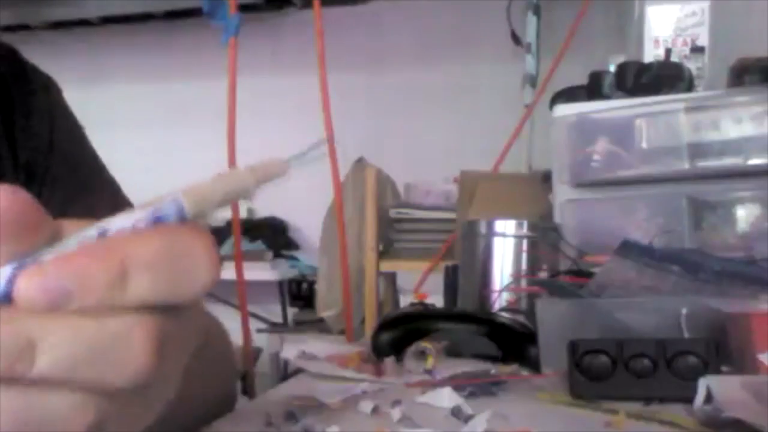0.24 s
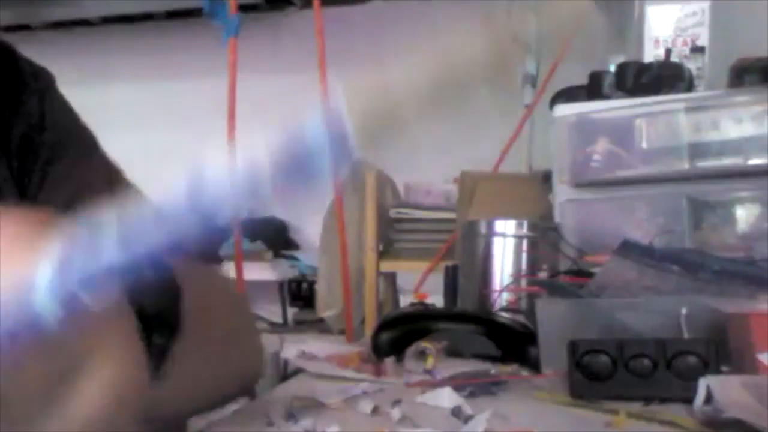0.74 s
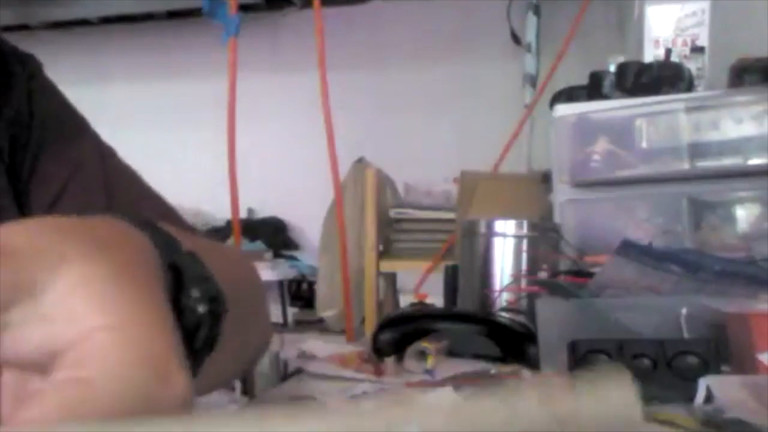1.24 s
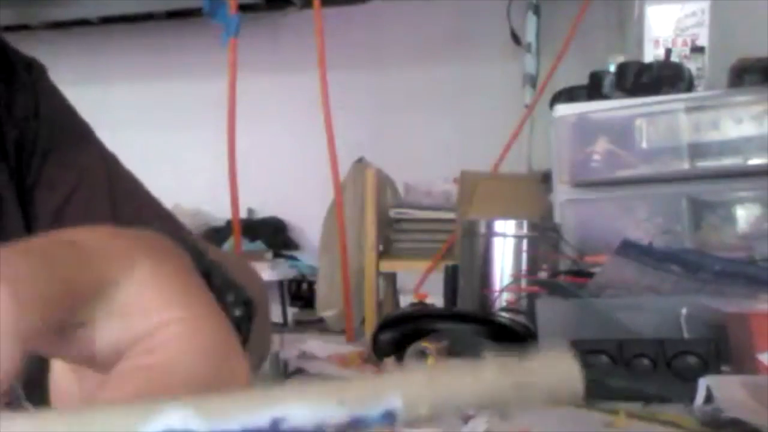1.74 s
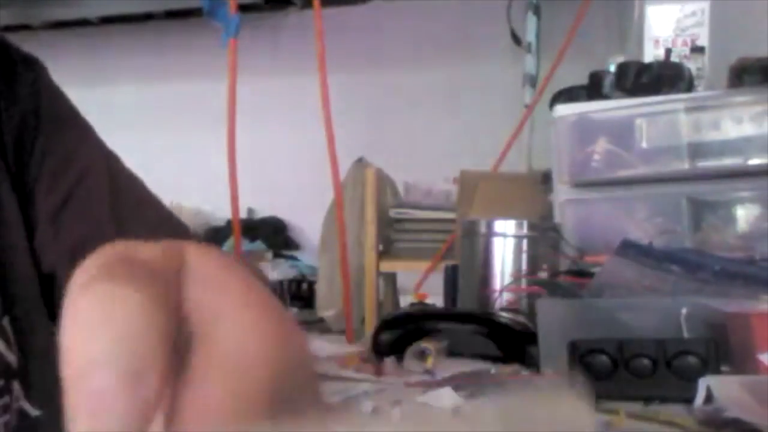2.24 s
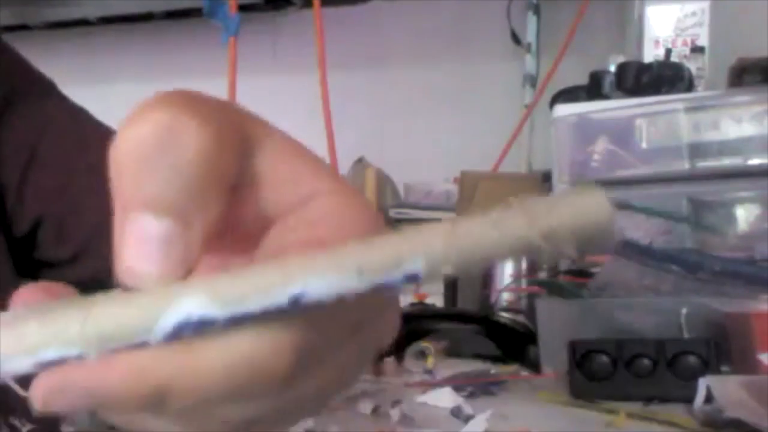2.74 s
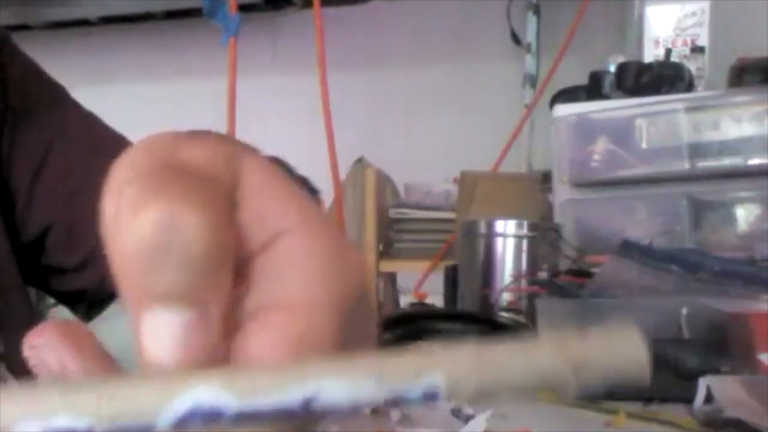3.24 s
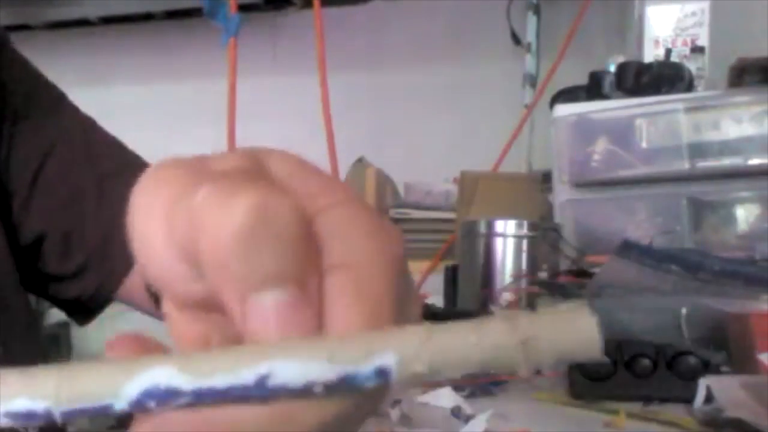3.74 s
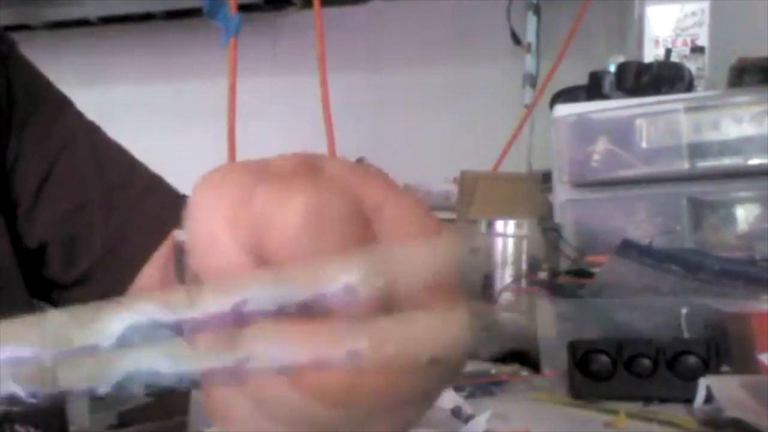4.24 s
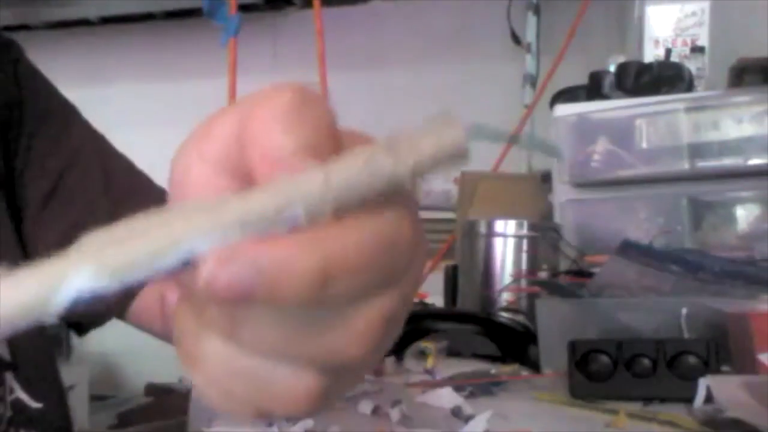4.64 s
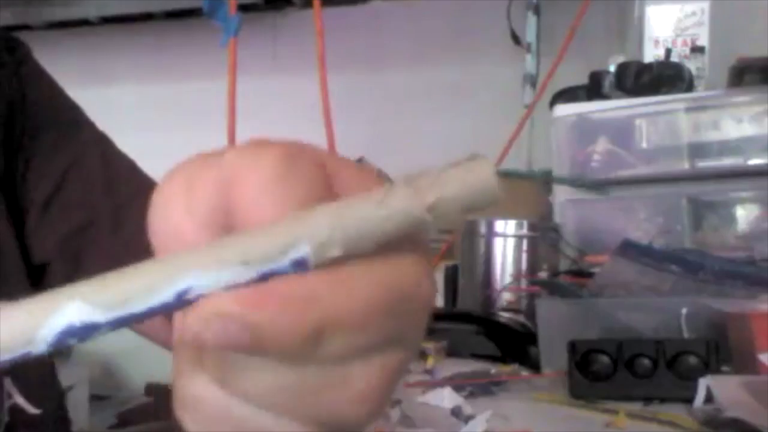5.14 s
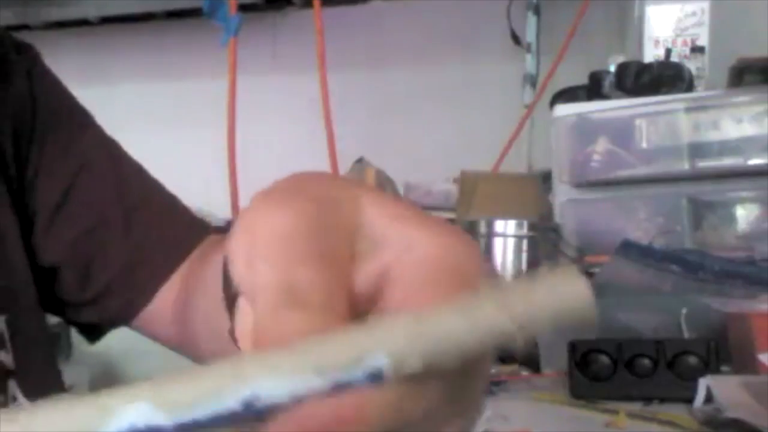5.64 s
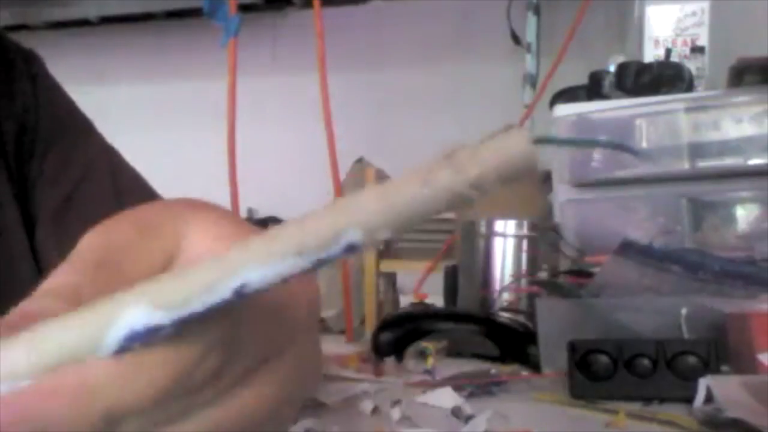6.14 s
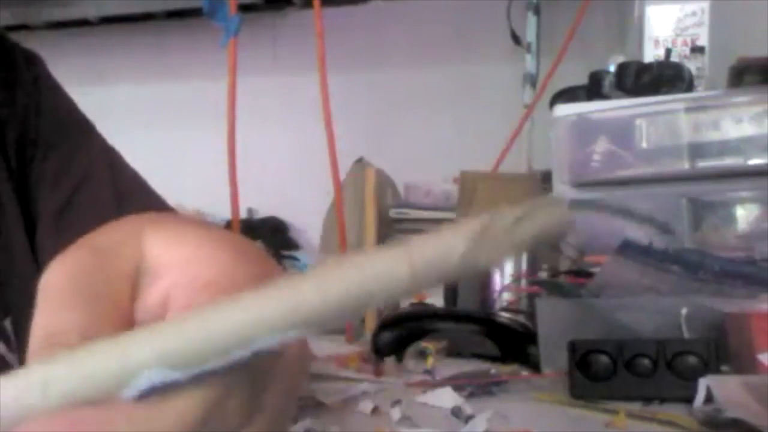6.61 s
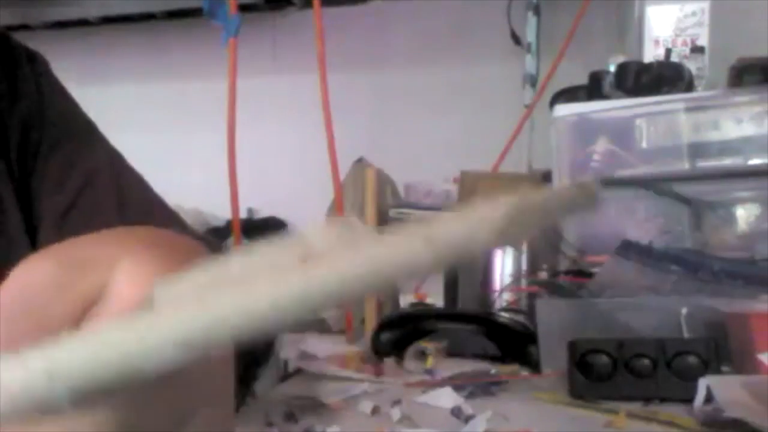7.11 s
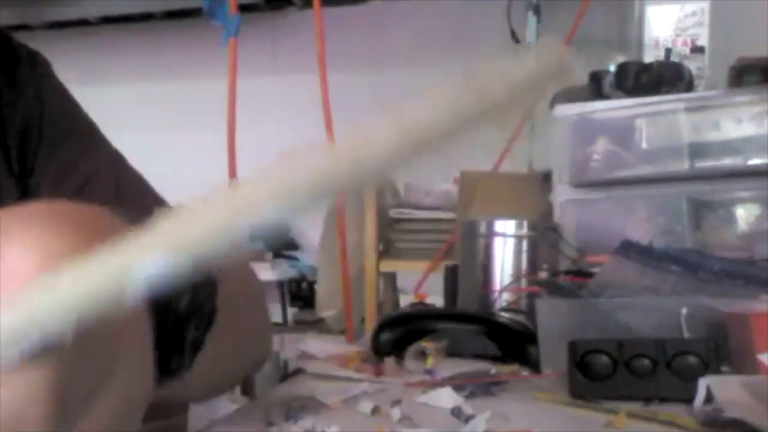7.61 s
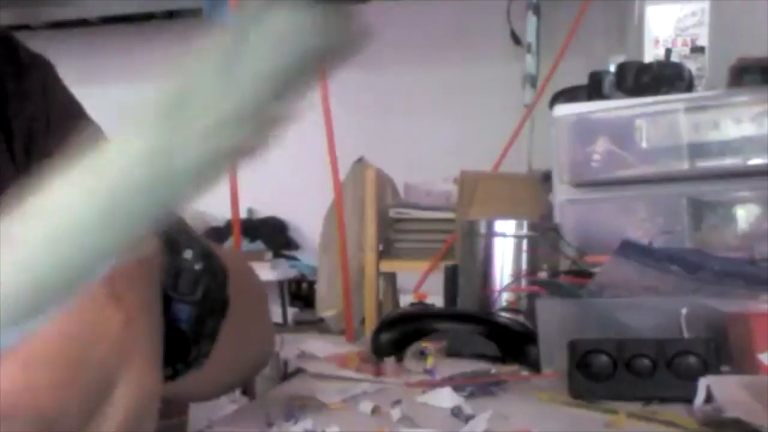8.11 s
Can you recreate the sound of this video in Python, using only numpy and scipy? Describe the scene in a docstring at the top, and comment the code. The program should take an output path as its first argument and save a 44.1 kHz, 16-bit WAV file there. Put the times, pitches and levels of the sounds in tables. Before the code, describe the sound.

Close to a small microphone on a workbench, hands pick paper wrapping off a cardboard tube. Sharp, separate snaps come first, with soft swishes and dull finger rubs, then a busier run of bright, crackling tears. Near the end an electric motor further off starts with a brief clatter and hums on under a few more rips. A faint fan whines throughout in the small room.

```python
"""Paper wrapping is picked and peeled off a cardboard tube, close to a small microphone on a workbench.
Its fibres fracture in short crackling pulls, and sudden releases snap and excite the modes of the tube.
Friction adds the swish of sliding paper and the rub of fingers, and the tube bumps against the hand.
A small fan whines throughout; near the end an electric motor starts with a clatter and hums on."""
import sys
import numpy as np
from scipy import signal
from scipy.fft import rfft, irfft
from scipy.io import wavfile
from scipy.ndimage import uniform_filter1d

SR = 44100
rng = np.random.default_rng(int(sys.argv[2]) if len(sys.argv) > 2 else 0)


def bounce(signal):
    """Save signal as a 16-bit WAV file at the path given by the first command-line argument."""
    frames = np.transpose(np.atleast_2d(signal))
    limited = np.clip(frames, -1, 1)
    pcm = np.round(limited * 32767).astype(np.int16)
    wavfile.write(sys.argv[1], SR, pcm)


N = 369116
TIME = np.arange(N) / SR


def from_db(db):
    """Amplitude ratio: a factor of ten for every 20 dB."""
    return 10 ** (np.asarray(db) / 20)


def drift(per_s):
    """Slow random fluctuation of unit power, interpolated between `per_s` values a second."""
    knots = rng.standard_normal(4000)
    curve = np.interp(TIME * per_s, np.arange(len(knots)), knots)
    return curve / np.sqrt(np.mean(curve ** 2) + 1e-20)


def colour(x, spectrum, size=4096):
    """Spectral shaping by a causal, minimum-phase filter of unit energy."""
    hz, db = np.transpose(spectrum)
    log_hz = np.log(np.maximum(np.fft.rfftfreq(size, 1 / SR), 1))
    beyond_band = np.abs(log_hz - np.clip(log_hz, np.log(hz[0]), np.log(hz[-1])))
    gain = from_db(np.interp(log_hz, np.log(hz), db) - 60 * np.minimum(beyond_band, 1))
    cepstrum = irfft(np.log(gain))
    response = irfft(np.exp(rfft(2 * cepstrum[:size // 2], size)))
    return signal.oaconvolve(x, response / np.linalg.norm(response))[:N]


def noise(spectrum):
    """Filtered Gaussian noise of unit power."""
    return colour(rng.standard_normal(N), spectrum)


def ring(age, hz, t60):
    """Free vibration of a damped mode: a sine that falls 60 dB in t60 seconds."""
    return from_db(-60 * age / t60) * np.sin(2 * np.pi * hz * age)


def add(track, start_s, piece):
    """Superposition of a short sound on a track."""
    at = int(start_s * SR)
    track[at:at + len(piece)] += piece[:N - at]


def avalanche(seconds, size=1024):
    """Cascading fracture: a burst of random-sign impulses swells and decays; unit energy."""
    age = TIME[:size] / max(seconds, 1 / SR)
    burst = rng.choice([-1, 1], size) * age * np.exp(-2.5 * age)
    return burst / (np.linalg.norm(burst) + 1e-12)


def impulses(per_s, spread_db, clump_db):
    """A Poisson process of tiny breaks or slips, with uneven, clumped strengths; unit power."""
    sizes = from_db(spread_db * np.minimum(rng.exponential(1, N), 4)) * rng.choice([-1, 1], N)
    occurs = rng.random(N) < per_s / SR
    train = sizes * occurs * from_db(clump_db * drift(300))
    local_power = np.abs(uniform_filter1d(train ** 2, size=1024))
    return train / np.sqrt(local_power + 1e-6)


def swells(rows):
    """Exponential envelopes summed in power, one per level column: 20 dB per rise or fall time."""
    power = np.zeros((len(rows[0]) - 3, N))
    for peak, rise, fall, *levels_db in rows:
        span = slice(max(int((peak - 2 * rise) * SR), 0), int((peak + 2 * fall) * SR))
        away = np.maximum((peak - TIME[span]) / rise, (TIME[span] - peak) / fall)
        power[:, span] += np.outer(from_db(levels_db), from_db(-20 * away)) ** 2
    return np.sqrt(power)


def strokes(rows, attack_s, release_s):
    """Attack, hold and release envelopes summed in power, one per level column."""
    power = np.zeros((len(rows[0]) - 2, N))
    for start, length, *levels_db in rows:
        span = slice(int(start * SR), int((start + length + 10 * release_s) * SR))
        age = TIME[span] - start
        shape = np.clip(age / attack_s, 0, 1) * np.exp(-np.maximum(age - length, 0) / release_s)
        power[:, span] += np.outer(from_db(levels_db), shape) ** 2
    return np.sqrt(power)


# Partials of the fan. Each row: frequency in Hz, median rms level in dB.
FAN_TONES = [(445, -69), (1331, -73.5), (1337, -83), (1779, -72), (2287, -70)]

def fan():
    """Modulation and beating: the tones waver in pitch and level, and two close ones interfere."""
    warped_time = TIME + np.cumsum(0.00105 * drift(8)) / SR
    return sum(from_db(db + 1.5 * drift(7.2)) * np.sqrt(2) * np.sin(2 * np.pi * hz * warped_time)
               for hz, db in FAN_TONES)


# Spectra of room noise and microphone hiss. Each row: frequency in Hz, relative level in dB.
ROOM_SPECTRUM = [(18, -49), (30, -22.5), (130, -23), (210, -26), (270, -7.5), (382, -10), (437, -10),
                 (520, -14.5), (595, -12), (908, -15), (1310, -15.5), (2290, -17), (3000, -20), (3900, -66),
                 (6600, -120)]
HISS_SPECTRUM = [(1760, -41), (3000, -10.5), (3380, -3), (3730, -10), (4000, -10), (7720, -11),
                 (11000, -6.5), (12800, -9.5), (14400, -2), (16000, -22)]

def noise_floor():
    """Stationary broadband noise: the room fills the low range, microphone hiss the high."""
    return from_db(-60) * noise(ROOM_SPECTRUM) + from_db(-59) * noise(HISS_SPECTRUM)


# Spectra of breaking paper and the cracking tube wall. Each row: frequency in Hz, relative level in dB.
PAPER_SPECTRUM = [(3820, -84), (6500, -13), (7640, -9.5), (8300, -5.5), (9020, -4), (10400, 2.5),
                  (11700, 5.5), (13100, -3.5), (15000, -7), (16000, -18)]
WALL_SPECTRUM = [(1500, -27), (2400, -3), (3000, 6), (3600, 6.5), (4300, 3), (5100, -1.5), (6500, -7.5),
                 (8000, -11), (10000, -15.5)]
# Modes of the hand-held tube. Each row: frequency in Hz, relative level in dB, 60 dB decay in seconds.
TUBE_MODES = [(242, -52, 0.13), (330, -31, 0.019), (370, -1.5, 0.028), (537, 2, 0.011), (670, -0.5, 0.0099),
              (923, 6, 0.0082), (1580, 1.5, 0.0067), (1840, -0.5, 0.0087)]
# Strips letting go. Each row: start in seconds, relative levels of crackle, wall, low knock and
# high knock in dB, wall pitch in Hz, time scale of the avalanche in seconds.
STRIP_SNAPS = [(0.2823, -28, -15.5, -69, -43, 3400, .0021), (0.4276, 2.5, -13, -31.5, -42, 5260, 0.0026),
               (1.2037, -19.5, -23.5, -64, -41, 3600, 0.0022), (1.6602, -0.5, -11, -36, -44, 3080, 0.006),
               (1.6757, -13.5, -19.5, -69, -56, 3540, 0.0031), (1.7673, -18, -22, -80, -53, 3460, 0.0036),
               (2.0567, -6, -31, -63, -70, 3260, .0025), (2.207, -27.5, -21, -68, -77, 3300, .0034),
               (2.4574, -22, -35, -56, -59, 2750, 0.003), (2.4709, -28, -30, -60, -51, 3230, 0.0022),
               (3.4783, -1.5, -15, -33.5, -36, 3330, .0023), (4.4389, 1.5, -0.5, -40, -25, 3590, .0016),
               (4.4502, -19, -9.5, -62, -64, 3440, .002), (5.1332, 0.5, -8, -36.5, -31, 3560, 0.0029),
               (5.1424, -28.5, -16, -47, -44, 3300, 0.0013), (6.3487, -19.5, -44, -74, -37, 3340, .0017),
               (6.548, -20, -25.5, -46, -53, 4000, .0025), (6.5784, -12.5, -19, -51, -45, 3380, 0.0024),
               (7.0712, -10, -35, -48.5, -58, 2840, .0025), (7.4254, 2, -24.5, -67, -48, 2300, 0.00092)]

def snapping():
    """Impulse excitation: a strip gives way, cracks the wall at its local pitch and rings the tube."""
    paper, wall, tube = np.zeros((3, N))
    age = TIME[:4096]
    for start, crackle_db, wall_db, low_db, high_db, wall_hz, seconds in STRIP_SNAPS:
        release = start + 0.001145  # the last fibres hold for a moment
        add(paper, start + 0.0004, from_db(crackle_db) * avalanche(seconds))
        add(wall, release, from_db([wall_db - 2]))
        add(wall, start, from_db(wall_db) * avalanche(1.05 * seconds))
        add(tube, release, from_db(wall_db - 13.5) * ring(age, wall_hz, t60=0.012))
        for hz, mode_db, t60 in TUBE_MODES:  # a harder release reaches the higher modes
            knock_db = np.interp(np.log(hz), np.log([400, 1100]), [low_db, high_db])
            add(tube, release, from_db(knock_db + mode_db) * ring(age, hz, t60))
    bass_cut = signal.butter(6, 215, "high", fs=SR, output="sos")  # a thin tube radiates no bass
    return colour(paper, PAPER_SPECTRUM) + colour(wall, WALL_SPECTRUM) + signal.sosfilt(bass_cut, tube)


# Spectrum of the rasping tube wall. Each row: frequency in Hz, relative level in dB.
RASP_SPECTRUM = [(900, -16), (1600, -5), (2400, -7.5), (3400, -3), (4300, -6), (5200, -8.5), (7000, -7.5),
                 (9000, -11)]
# Pulls on the paper. Each row: peak time, rise and fall in seconds, crackle and rasp levels in dB.
PAPER_PULLS = [(0.437, .005, 0.063, -42.5, -62), (0.677, 0.061, 0.016, -54, -55),
               (1.205, 0.13, 0.08, -57, -55), (2.058, 0.039, 0.028, -35.5, -53.5),
               (2.152, 0.014, 0.096, -45.5, -56), (2.21, .1, 0.034, -56, -54.5),
               (4.01, .04, .05, -47.5, -57.5), (4.437, .014, .03, -45, -48), (5.555, .035, 0.01, -44, -55),
               (5.672, .02, 0.027, -46.5, -54), (5.802, 0.034, 0.027, -37.5, -52),
               (5.824, 0.018, 0.025, -39.5, -53), (5.936, 0.044, 0.036, -35, -53),
               (6.264, 0.018, 0.034, -38.5, -46), (6.289, 0.019, 0.022, -44, -53),
               (6.345, 0.062, 0.069, -41.5, -54.5), (6.43, .15, .25, -52, -63.5),
               (6.55, .012, .04, -47, -51), (6.581, .04, 0.027, -40, -49), (6.73, 0.062, 0.059, -31.5, -44),
               (7.073, .012, 0.033, -42, -47), (7.116, .03, .03, -51, -58), (7.33, .02, .05, -42.5, -62),
               (7.385, .1, .1, -51, -64), (7.437, 0.027, 0.085, -34.5, -54), (7.536, .015, 0.022, -43, -60),
               (8.16, .04, .03, -42.5, -50.5), (8.347, .03, 0.11, -44, -48.5)]

def tearing():
    """Progressive fracture: runs of breaking fibres sound bright in the paper and rasp in the wall."""
    crackle, rasp = swells(PAPER_PULLS)
    breaks = impulses(per_s=2400, spread_db=2.5, clump_db=4.5)
    return colour(crackle * breaks, PAPER_SPECTRUM) + colour(rasp * breaks, RASP_SPECTRUM)


# Spectrum of sliding paper. Each row: frequency in Hz, relative level in dB.
SWISH_SPECTRUM = [(6000, -47), (7500, -12.5), (8500, -6.5), (10000, 0), (11300, 5.5), (12500, -1.5),
                  (13500, -7), (15500, -17)]
# Slides along the wrapping. Each row: start and length in seconds, swish and rasp levels in dB.
PAPER_SLIDES = [(0.513, 0.023, -51.5, -59.5), (1.088, 0.037, -52.5, -55.5), (1.51, .05, -69, -59),
                (2.315, 0.033, -58.5, -59), (3.405, 0.058, -60, -60), (3.612, .045, -47, -60),
                (3.7, .024, -49, -61), (3.886, 0.022, -49.5, -62), (4.09, 0.071, -49, -55),
                (4.18, .1, -62, -61), (5.143, .035, -50, -61), (5.243, .1, -58.5, -77),
                (5.718, 0.016, -50, -68), (6.04, 0.022, -52, -69), (6.075, 0.035, -44, -51.5),
                (6.153, .047, -50, -61), (6.645, 0.035, -56, -64), (6.878, .045, -45.5, -59.5),
                (6.915, 0.087, -42.5, -56), (7.64, 0.14, -53, -63), (7.872, 0.017, -42, -57)]

def sliding():
    """Sliding friction: fingers and loose paper catch on countless small fibres, making a fine swish."""
    swish, rasp = strokes(PAPER_SLIDES, attack_s=0.0095, release_s=0.0085)
    catches = impulses(per_s=12000, spread_db=4.5, clump_db=1.5)
    return colour(swish * catches, SWISH_SPECTRUM) + colour(rasp * catches, RASP_SPECTRUM)


# Strong single fibres breaking. Each row: time in seconds, crackle and wall levels in dB.
FIBRE_CRACKS = [(0.677, -25, -32), (1.0194, -26, -40), (2.152, -31, -42), (3.31, -24, -46),
                (3.3385, -23, -45), (3.3547, -26, -45), (5.5496, -18, -37), (5.5564, -22, -34),
                (5.7757, -16, -35), (5.7985, -10, -34), (5.8202, -19, -38), (5.8875, -22, -44),
                (5.934, -6.5, -44), (5.9444, -15, -40), (5.9554, -16, -43), (6.0825, -19, -39),
                (6.2497, -14.5, -25), (6.265, -16, -24), (6.4511, -20.5, -34), (6.469, -26, -34),
                (6.5701, -20, -24), (6.6836, -16, -39), (6.7005, -13, -38), (6.7234, -7, -21),
                (6.7306, -11, -18.5), (6.765, -18, -28), (6.772, -14, -35), (7.443, -13, -38),
                (7.4496, -12, -32), (7.4574, -11, -38), (7.481, -14, -43), (7.644, -22, -40),
                (8.1579, -17, -25)]

def cracking():
    """Impulse response: one fibre breaks and excites the paper, then the tube wall."""
    paper, wall = np.zeros((2, N))
    for start, crackle_db, wall_db in FIBRE_CRACKS:
        add(paper, start + 0.00019, from_db([crackle_db]))
        add(wall, start + 0.00037, from_db([wall_db]))
    return colour(paper, PAPER_SPECTRUM) + colour(wall, RASP_SPECTRUM)


# Spectra of skin on cardboard. Each row: frequency in Hz, relative level in dB.
THUD_SPECTRUM = [(100, -33), (190, -9.5), (280, 8.5), (400, 7.5), (600, -3), (900, -33), (1500, -31)]
RUB_SPECTRUM = [(400, -25), (700, 3.5), (1000, 3), (1500, -3), (2200, -7), (3500, -20), (6000, -19.5)]
# Fingers shifting their grip. Each row: start and length in seconds, thud and rub levels in dB.
GRIP_SHIFTS = [(2.672, .025, -56.5, -70), (3.01, 0.023, -57.5, -69), (3.268, 0.016, -65, -60),
               (3.418, 0.027, -47, -48.5), (3.46, 0.056, -59, -66), (3.555, 0.026, -59, -48),
               (3.59, 0.092, -58, -65), (3.702, 0.028, -45.5, -50), (3.75, .05, -56.5, -63),
               (3.89, .02, -54, -59), (4.505, 0.033, -56, -51.5), (4.835, 0.034, -57, -58),
               (4.945, .02, -66, -59), (5.035, .035, -53.5, -60), (5.475, .05, -57, -68),
               (5.745, .02, -55.5, -65), (5.79, 0.045, -61, -60), (6.135, 0.022, -55, -55),
               (7.055, .07, -53.5, -65), (7.16, 0.029, -57, -66)]

def gripping():
    """Stick-slip friction of skin on cardboard gives dull thuds and a soft rub."""
    thud, rub = strokes(GRIP_SHIFTS, attack_s=0.0087, release_s=0.018)
    slips = impulses(per_s=2500, spread_db=1.5, clump_db=0.5)
    return colour(thud * slips, THUD_SPECTRUM) + colour(rub * slips, RUB_SPECTRUM)


# The tube meeting the hand. Each row: start in seconds, level in dB, pitch in Hz.
TUBE_BUMPS = [(5.487, -43, 316), (6.14, -45, 442), (7.027, -35.5, 454), (7.044, -39, 445)]

def bumping():
    """Soft impact: the hand stops the tube, and one damped mode gives a short hollow note."""
    notes, age = np.zeros(N), TIME[:8192]
    soft_onset = 1 - np.exp(-age / 0.002)
    for start, db, hz in TUBE_BUMPS:
        add(notes, start, from_db(db) * soft_onset * ring(age, hz, t60=0.075))
    return notes


# Hum and rotor tones. Each row: frequency at normal speed in Hz, relative level in dB.
MOTOR_TONES = [(240, -71.5), (339.3, -49), (393, -72), (452.2, -64), (479.5, -51.5), (678.3, -71),
               (720.5, -61.5), (904.4, -69), (959.5, -64), (1017, -69.5), (1200, -69), (1260, -69),
               (1357, -54), (1599, -67), (2729, -72), (3391, -72), (3688, -76), (3930, -72.5), (5432, -74),
               (5771, -74), (6449, -73.5), (7946, -73), (8188, -67.5), (8425, -68)]
# Slight overspeed until the load builds up. Each row: time in seconds, ratio to normal speed.
SPEED_CURVE = [(7.2, 1.0), (7.27, 1.01), (7.34, 1.007), (7.45, 1.0)]
# The housing's thin whine. Its one row: peak time, rise and fall in seconds, relative level in dB.
WHINE_SWELL = [(7.792, .15, .16, -58.5)]
# Spectra of that whine and the motor's rush. Each row: frequency in Hz, relative level in dB.
WHINE_SPECTRUM = [(4850, -26), (5100, -2), (5350, -31)]
RUSH_SPECTRUM = [(150, -54), (215, -16), (250, 1), (450, 5.5), (700, -4), (1100, -7), (1400, 0),
                 (2000, -9.5), (3500, -11), (7000, -17.5), (8200, -5.5), (9300, -12), (11000, -10),
                 (15000, -39)]

def motor():
    """Forced vibration: tones follow the rotor's unsteady speed, over a rush and one swell of whine."""
    start_s, attack_s, surge_s = 7.197, 0.027, 0.027
    running, age = TIME > start_s, np.maximum(TIME - start_s, 0)
    surge_db = 0.5 * np.exp(-age / surge_s)
    envelope = np.minimum(age / attack_s, 1) * from_db(3 + surge_db)
    speed = np.interp(TIME, *np.transpose(SPEED_CURVE)) + 0.00042 * drift(11)
    rotor_time = np.cumsum(speed) / SR
    tones = np.zeros(N)
    for hz, db in MOTOR_TONES:
        cycles = hz * rotor_time[running] + rng.random()
        tones[running] += from_db(db) * np.sqrt(2) * np.sin(2 * np.pi * cycles)
    whine = swells(WHINE_SWELL)[0] * noise(WHINE_SPECTRUM)
    rush = from_db(-54.5) * noise(RUSH_SPECTRUM)
    return envelope * (from_db(-0.5) * tones + rush + whine)


# Spectrum of the shaken housing. Each row: frequency in Hz, relative level in dB.
CLATTER_SPECTRUM = [(190, -25), (260, -5.5), (500, -10), (800, -18), (1400, -11.5), (2200, -23.5),
                    (2900, -9.5), (3500, -15), (4600, -14.5), (5000, -4.5), (5700, -15.5), (6800, -9),
                    (7800, -0.5), (11000, 3), (15500, -14)]
# Jolts in close pairs. Each row: peak time in seconds, level in dB, rise and decay constants in seconds.
HOUSING_JOLTS = [(7.199, -23.5, 0.0014, 0.0072), (7.208, -26, 0.0029, 0.0066), (7.247, -16, 0.0073, 0.0071),
                 (7.256, -21, 0.0084, 0.019)]

def clattering():
    """Starting transient: the motor shakes its metal housing in two bright bursts of noise."""
    power = np.zeros(N)
    for peak, db, rise, decay in HOUSING_JOLTS:
        away = np.maximum((peak - TIME) / rise, (TIME - peak) / decay)
        power += from_db(db) ** 2 * np.exp(-2 * np.minimum(away, 20))
    return np.sqrt(power) * noise(CLATTER_SPECTRUM)


def reflections(x, t60, delay_s, size=16384):
    """Diffuse reverberation: convolution with delayed, exponentially decaying noise of unit energy."""
    age = TIME[:size]
    response = rng.standard_normal(size) * from_db(-60 * age / t60) * (age > delay_s)
    return signal.oaconvolve(x, response / np.linalg.norm(response))[:N]


def scene():
    """Superposition: close hand work, its bench and room reflections, and the machines further off."""
    hands = snapping() + tearing() + sliding() + cracking() + gripping() + bumping()
    bench = from_db(-11) * reflections(hands, t60=0.052, delay_s=0.0027)
    room = from_db(-23) * reflections(hands, t60=0.18, delay_s=0.0085)
    return (hands + bench + room + fan() + noise_floor() + motor() + clattering())[None]


def record(dry):
    """Band limiting: a steep elliptic low-pass removes the treble above 15.9 kHz."""
    return signal.sosfilt(signal.ellip(10, 0.2, 80, 15900, fs=SR, output="sos"), dry)


dry = scene()
out = record(dry)
bounce(out)
```